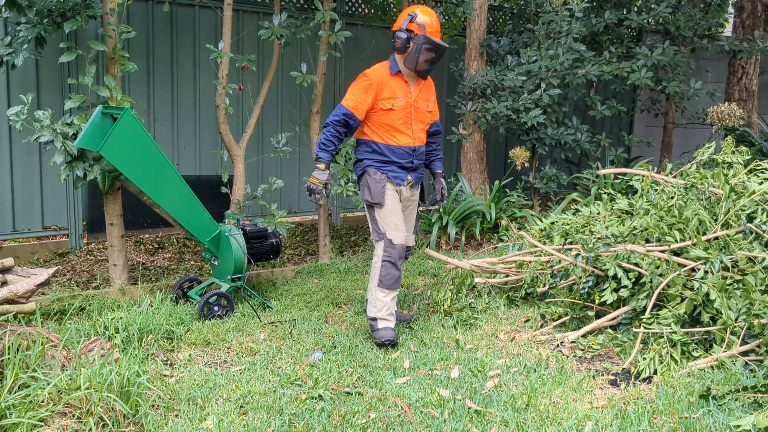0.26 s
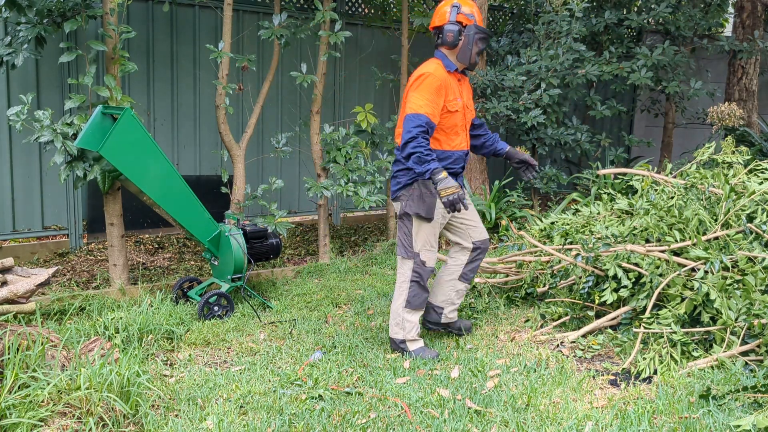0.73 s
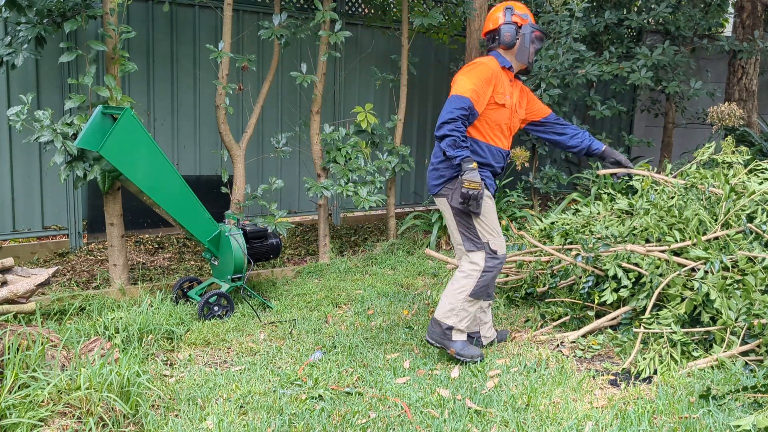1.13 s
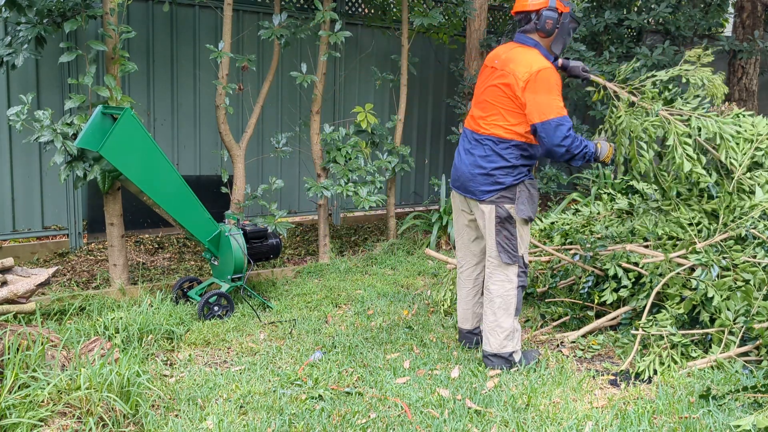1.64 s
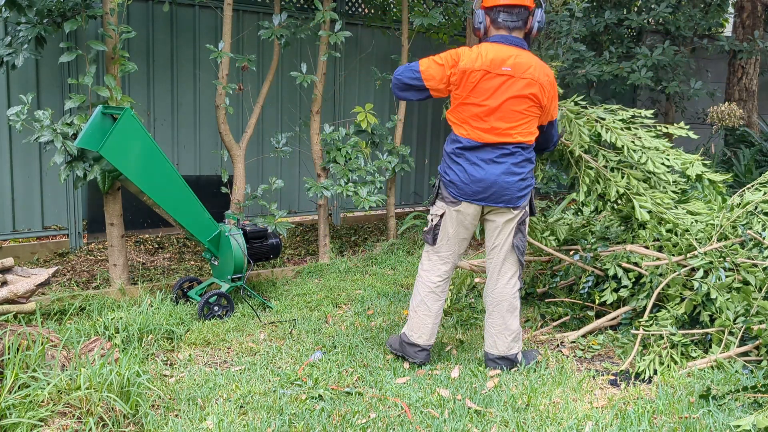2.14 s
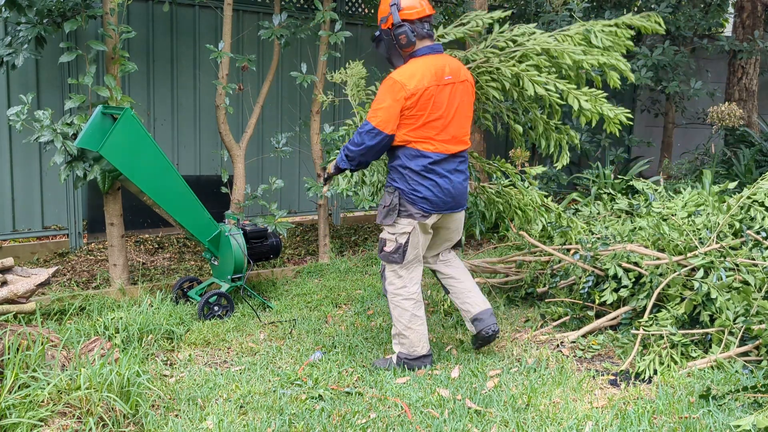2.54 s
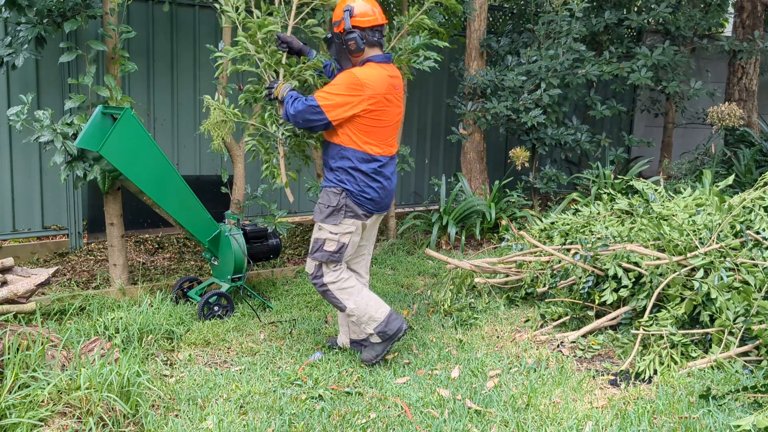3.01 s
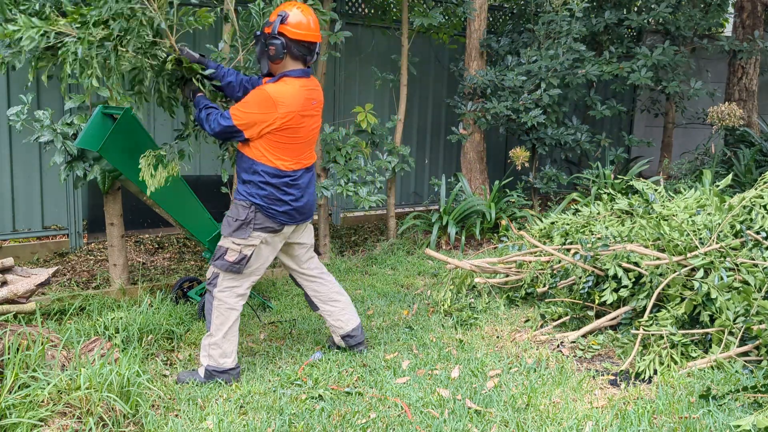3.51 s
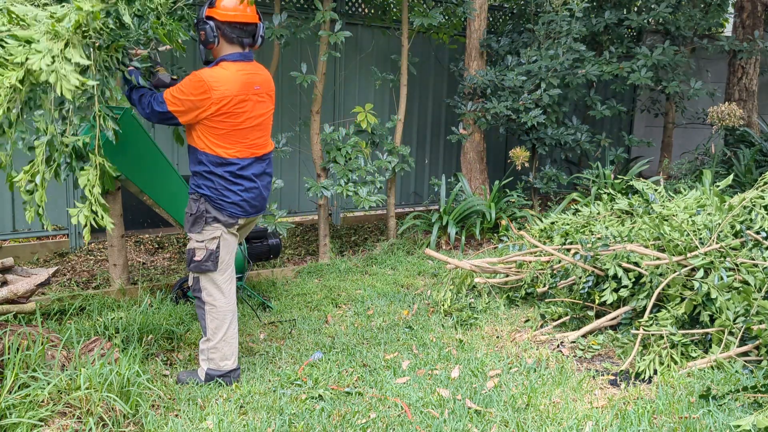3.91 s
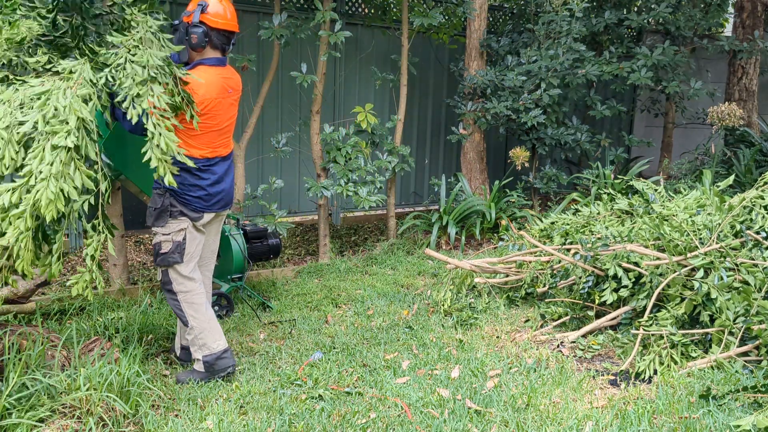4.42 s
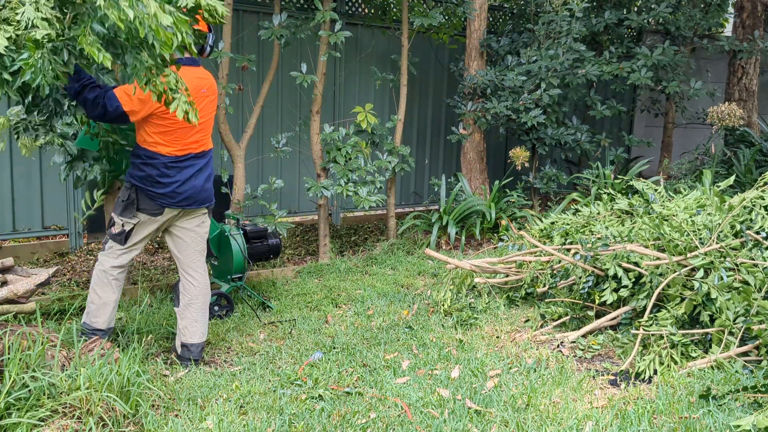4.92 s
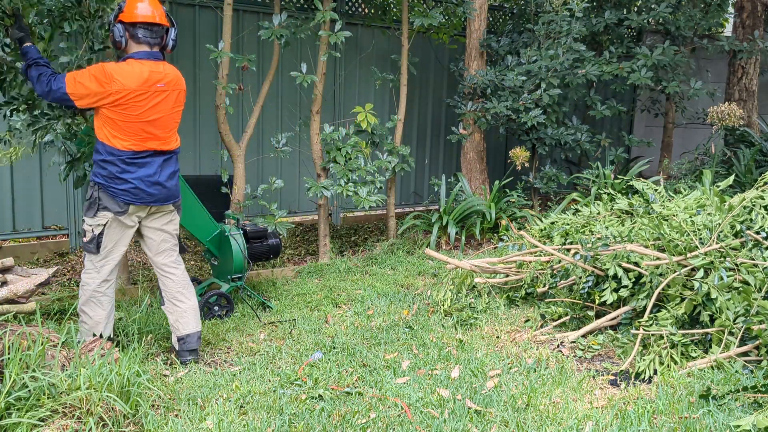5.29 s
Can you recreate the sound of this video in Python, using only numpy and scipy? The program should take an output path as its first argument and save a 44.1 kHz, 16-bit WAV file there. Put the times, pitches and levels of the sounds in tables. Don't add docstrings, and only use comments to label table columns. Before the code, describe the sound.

In a fenced backyard, an electric wood chipper a few metres away, slightly left, runs up in under a second from low drone and whine to steady idle with rushing fan air. Leafy branches are dragged off a heap and carried over, rustling crisply, then twigs snap near the end. Stereo phone microphone; nothing is chipped.

```python
import sys
import numpy as np
from scipy import signal
from scipy.fft import rfft, irfft
from scipy.io import wavfile
from scipy.ndimage import uniform_filter1d

SR = 44100
rng = np.random.default_rng(int(sys.argv[2]) if len(sys.argv) > 2 else 0)


def nominal_scale(level):
    x = np.asarray(level, float) / 20
    return 10 ** x


def digitize_waveform(pressure):
    field = np.atleast_2d(pressure).T
    bounded = np.clip(field, -1, 1)
    quanta = np.round(bounded * 32767).astype(np.int16)
    wavfile.write(sys.argv[1], SR, quanta)


N = 244755
T = np.arange(N) / SR
HZ = np.fft.rfftfreq(N, 1 / SR)
IDLE_HZ, MAINS_HZ = 49.68, 50
SCREEN_S, SCREEN_SPAN_S = 3.52, .15


def unit(x):
    return x / np.sqrt(np.mean(x ** 2))


def spectrum(rows):
    hz, value = np.transpose(rows)
    return np.interp(np.log(HZ + 1), np.log(hz), value)


def shape(x, gain):
    return irfft(rfft(x) * gain, N)


def walk(rate_hz):
    k = int(SR / rate_hz)
    held = np.repeat(rng.standard_normal(N // k + 1), k)
    smooth = uniform_filter1d(uniform_filter1d(held, k), k)
    return unit(smooth[:N])


def bump(s, length_s):
    return np.exp(-((T - s) / length_s) ** 2)


def step(s, span_s):
    return (1 + np.tanh((T - s) / span_s)) / 2


def at_ports(paths, lag_s, likeness):
    like = np.clip(likeness, 0, 1)
    delay = np.array([np.ones(len(HZ)), np.exp(-2j * np.pi * HZ * lag_s)])
    direct = rfft(paths[0]) * delay
    scattered = rfft(paths[1:])
    return irfft(np.sqrt(like) * direct + np.sqrt(1 - like) * scattered, N)


def swept_db(hz):
    # [f/Hz, width/Hz, level/dB]
    swept = [(86, 3.4, -5), (117, 7.3, 3), (129.3, 1.83, -32), (131.9, 2.5, 8), (138, 1.2, 2.5),
             (144.6, 2, -16), (164.5, 2.2, -22), (188, 10, -9), (216.6, 7.3, 9.5), (219, 3, -2.5),
             (238, 9, 4.5), (265, 8.5, -9), (287, 10, -10.5)]
    peaks_db = sum(db * np.exp(-((hz - f) / width) ** 2) for f, width, db in swept)
    return peaks_db - 10 * np.log10(1 + (135 / hz) ** 8)


def disc(turns, speed):
    # [multiple, level/dB, waver/dB, change once the worker screens the chute/dB, power of speed]
    strong = [(2, -30.2, .7, -1.4, 1.5), (3, -20.1, .3, .4, 2.2), (5, -35.3, .7, 0, .8),
              (6, -38.3, .8, 2.5, 1.4)]
    # [multiple, level/dB]
    weak = [(1, -44), (4, -48.5), (7, -46), (8, -43), (9, -60), (10, -48), (11, -58.5), (12, -51),
            (15, -73), (18, -75.5), (20, -58), (21, -67.5), (22, -57.5), (25, -61), (26, -59), (27, -68),
            (28, -59), (30, -62), (32, -61), (36, -64), (38, -68), (54, -67), (62, -72)]
    start = rng.random(65)
    screened = step(SCREEN_S, SCREEN_SPAN_S)
    out = 0
    for k, db, waver_db, screen_db, power in strong:
        k = round(k)
        sweep_db = swept_db(k * IDLE_HZ * speed) - swept_db(k * IDLE_HZ)
        level_db = db + sweep_db + waver_db * walk(8) * (T > 1) + screen_db * screened
        out = out + nominal_scale(level_db) * speed ** power * np.sin(2 * np.pi * (k * turns + start[k]))
    for k, db in weak:
        k = round(k)
        level_db = db + 1.8 * walk(4) - 3 * (screened - .4)
        out = out + nominal_scale(level_db) * speed ** 6 * np.sin(2 * np.pi * (k * turns + start[k]))
    return np.sqrt(2) * out


def slots(turns, speed):
    # [f/Hz, width/Hz, level/dB]
    casing_modes = [(625, 60, -3), (705, 60, 0), (765, 55, 2), (850, 70, -3), (960, 90, -8), (1110, 60, -9),
                    (1480, 160, -5), (1700, 250, -10), (1960, 120, -8), (2090, 50, 1), (2950, 300, -12)]
    # [t/s, length/s, level/dB]
    squeals = [
        (0.19, 0.075, -53),
        (0.314, 0.059, -57),
    ]
    overtones_db = [-17.5, -26.5]
    overtone_speed = [2.2, 1.5]
    slot_count = 24
    slip = 1 - speed * IDLE_HZ / MAINS_HZ
    field = 2 * np.pi * 2 * MAINS_HZ * T
    throb = 1 + .3 * np.cos(field) + .3 * np.cos(2 * np.pi * turns)
    casing = .01 + sum(nominal_scale(db) / (1 + 1j * (HZ - hz) / (width / 2)) for hz, width, db in casing_modes)

    levels_db, powers = [0, *overtones_db], [4.0, *overtone_speed]
    rough_hz, levelling = [135, 55, 40], [.5, .25, .1]
    whine = 0
    for k in range(3):
        shake = shape(rng.standard_normal((2, 3, N)), 1 / (1 + 1j * HZ / rough_hz[k]))
        angle = 2 * np.pi * ((k + 1) * slot_count * turns + min(k, 1) * MAINS_HZ * T)
        steady = .5 if k else .35
        force = throb * ((steady + unit(shake[0])) * np.cos(angle) + unit(shake[1]) * np.sin(angle))
        ring = shape(force, casing if k else casing ** 2)
        ring = ring / uniform_filter1d(ring ** 2, size=1400) ** levelling[k]
        whine = whine + nominal_scale(levels_db[k]) * speed ** powers[k] * ring
    whine = whine * nominal_scale(-1.5) * slip ** 1.91

    hum = nominal_scale(-57) * np.sqrt(2) * np.sin(field)
    for k, (db, power) in enumerate([(-47, 1.2), (-36, 1.6)]):
        hum = hum + nominal_scale(db) * slip ** power * np.sqrt(2) * np.sin((k + 1) * field)

    squeal = unit(shape(rng.standard_normal((3, N)), 1 / (1 + ((HZ - 7200) / 450) ** 2)))
    squeal = squeal * sum(nominal_scale(db) * bump(s, length_s) for s, length_s, db in squeals)
    return whine + hum + squeal


def fan(turns, speed):
    # [f/Hz, level/dB per Hz]
    chute = [(20, -83), (34, -72), (58, -56.5), (80, -60.5), (115, -54.5), (135, -50), (170, -59.5),
             (215, -54.5), (238, -58), (275, -66.5), (410, -63), (460, -63.5), (535, -68), (575, -61.5)]
    # [f/Hz, level/dB per Hz]
    housing = [(600, -63.5), (680, -69.5), (830, -70.5), (1100, -72), (1500, -73.5), (2000, -74),
               (2300, -78), (3200, -83), (4500, -89.5), (5200, -90.5), (8000, -90.5), (12000, -92.5),
               (15500, -90)]
    # [f/Hz, width/Hz, level/dB]
    panels = [(630, 36, -4.5), (837, 34, 3.5), (1127, 67, 3), (2060, 38, 1.5), (4550, 80, 8.5)]
    colour_db = np.where(HZ < housing[0][0], spectrum(chute), spectrum(housing))
    colour_db = colour_db + sum(db / (1 + ((HZ - hz) / (width / 2)) ** 2) for hz, width, db in panels)
    air = rfft(rng.standard_normal((3, N))) * nominal_scale(colour_db) * np.sqrt(SR / 2)

    growth = [1.1, 0.86, 2.0, 1.65, 2.8, 0.31, 0.27, 1.2, 1.3, .3]
    screened = [0, 0, 0, .6, 1, 1, .8, .6, .3, .3]
    screen_db = 0.3 - 0.24 * step(SCREEN_S, SCREEN_SPAN_S)
    octave = np.log2((HZ + 1) / 40)
    out = 0
    for k in range(10):
        offset = octave - k if k else np.maximum(octave, 0)
        band = irfft(air * np.cos(np.pi / 2 * np.clip(offset, -1, 1)) ** 2, N)
        out = out + band * speed ** growth[k] * nominal_scale(screened[k] * screen_db + .5 * walk(5.6))
    puff = 1 + 0.032 * np.cos(2 * np.pi * turns) + 0.04 * np.cos(2 * np.pi * 2 * turns)
    return out * puff


def leaves():
    # [t/s, length/s, rustle level/dB, scrape relative level/dB]
    stirs = [(0.143, 0.18, -48.5, -13), (0.317, 0.058, -46.5, -9), (.865, .035, -46.5, -7),
             (1.1, 0.31, -52.5, 0), (1.47, 0.19, -43, -6.5), (1.694, 0.26, -39.5, -10),
             (1.92, 0.25, -45, -11), (2.265, 0.19, -41, -12), (3.084, 0.12, -48, -16),
             (3.305, .035, -42, -18), (3.468, 0.091, -46, -10), (3.677, 0.14, -52, -3),
             (3.884, 0.026, -44, -10), (3.95, 0.034, -44, -4), (4.073, 0.11, -46, -8),
             (4.24, 0.051, -43, -7), (4.406, 0.11, -42.5, -15), (4.71, 0.11, -40.5, -5.5),
             (4.946, 0.17, -49.5, -5), (5.223, 0.075, -45, -8), (5.35, 0.25, -45, -6),
             (5.56, 0.042, -42.5, 0)]
    # [f/Hz, level/dB per Hz]
    leaf = [(2500, -37), (4000, -13), (6500, 0), (9500, -1.5), (12000, 0.5), (15500, 1)]
    lift_s, walk_over_s = 1.44, 2.3
    heap_pan_db, chute_pan_db = 1, 3
    carried = nominal_scale(-49) * step(lift_s, .3)
    rustle_power, scrape_power = carried ** 2, (carried * nominal_scale(-3.5)) ** 2
    for s, length_s, db, scrape_db in stirs:
        swell = bump(s, length_s)
        rustle_power = rustle_power + (nominal_scale(db) * swell) ** 2
        scrape_power = scrape_power + (nominal_scale(db + scrape_db) * swell) ** 2

    chance = rng.random((2, 3, N))
    size = rng.standard_normal((2, 3, N)) * nominal_scale(2.2 * rng.exponential(size=(2, 3, N)))
    density = np.reshape([.3, .12], (2, 1, 1))
    ticks = size * (chance < density) * nominal_scale(.85 * walk(30))
    fine = unit(shape(ticks[0], nominal_scale(spectrum(leaf)) * np.clip(HZ / 4000, 0, 1) ** 3))
    coarse = unit(shape(ticks[1], 1 / (1 + ((HZ - 3900) / 1300) ** 2)))
    rustle = np.sqrt(rustle_power) * fine + np.sqrt(scrape_power) * coarse

    at_heap = step(lift_s, .1) * (1 - step(walk_over_s, .2))
    pan_db = chute_pan_db + (heap_pan_db - chute_pan_db) * at_heap
    return at_ports(rustle, .0001, 0.086) * nominal_scale(np.array([pan_db, -pan_db]) / 2)


def twigs():
    # [t/s, peak level/dB, ring f/Hz, broad crack relative level/dB]
    snaps = [(2.948, -40, 3040, 10), (3.0131, -41, 3530, -3), (3.2994, -39, 4210, -1),
             (3.4898, -39, 3920, 11), (3.861, -37, 3780, -1), (3.878, -28.5, 12000, -5),
             (3.9364, -35, 3710, -7), (3.9432, -32.5, 3700, 13), (4.2294, -49, 4550, -3),
             (4.6184, -35, 4710, 1), (4.6374, -34, 3570, 5), (4.6614, -39, 4490, 3),
             (4.6914, -37, 4100, -11), (4.7156, -29, 4420, -5), (4.7184, -32, 3770, -6),
             (4.7234, -30, 3440, -5), (4.7447, -32, 5200, -5)]
    out, t = np.zeros((3, N + 800)), np.arange(600) / SR
    crack = rng.standard_normal((len(snaps), 3, len(t)))
    tail = np.exp(-t / 0.00086) + 0.22 * np.exp(-t / .004)
    for (s, db, hz, crack_db), noise in zip(snaps, crack):
        i = int((s + 0.00035) * SR)
        ring = np.sin(2 * np.pi * hz * t) * np.exp(-t * hz / 6.5)
        burst = np.diff(noise, prepend=0) / 2 * tail
        out[:, i:i + len(t)] += nominal_scale(db) * (ring + nominal_scale(crack_db) * burst)
    return at_ports(out[:, :N], 0.00016, 0.96) * nominal_scale([[1.8], [-1.8]])


def scene():
    # [t/s, shaft f/Hz]
    run_up = [(0, 24.66), (.1, 27.67), (.324, 35.35), (.53, 40.63), (.756, 46.48), (.832, 48.4),
              (.912, 49.04), (1, 49.68)]
    # [f/Hz, share]
    common = [(60, 1), (340, 0.9), (520, 0.57), (800, 0.85), (1500, 0.33), (3500, 0.33), (7000, 0.19),
              (15000, 0.061)]
    # [f/Hz, level/dB]
    left_db = [(60, 2.0), (110, 1.5), (200, 1.5), (380, 2.5), (700, 4.0), (1290, 5.0), (2380, 4.5),
               (4400, 3.0), (8120, 1.5), (15000, 3.0)]
    shaft_hz = np.interp(T, *np.transpose(run_up))
    turns, speed = np.cumsum(shaft_hz) / SR, shaft_hz / IDLE_HZ
    drone_lag_s = np.where((HZ > 200) & (HZ < 700), .00027, .00011)
    drone = at_ports(np.tile(disc(turns, speed), (3, 1)), drone_lag_s, 1)
    whine = at_ports(slots(turns, speed), 0.0001, 0.78)
    rush = at_ports(fan(turns, speed), 0.00022, spectrum(common))
    side = nominal_scale(np.array([1, -1])[:, None] * spectrum(left_db) / 2)
    return shape(drone + whine + rush, side) + leaves() + twigs()


def band_limit(x):
    return signal.sosfilt(signal.butter(12, 15710, fs=SR, output="sos"), x)


def record(dry):
    # [f/Hz, level/dB]
    port = [(30, 1), (4600, -0.5), (5700, -3.5), (6700, -2), (8300, -3.5), (9500, 0.5), (12200, 0.5),
            (13000, -1), (14000, -9.5), (14900, -9), (15700, -6)]
    bass_cut = 1 / np.sqrt(1 + (36 / (HZ + 1)) ** 6)
    mix = shape(dry, (HZ < 15740) * nominal_scale(spectrum(port)) * bass_cut)
    return band_limit(mix)


dry = scene()
out = record(dry)
digitize_waveform(out)
```